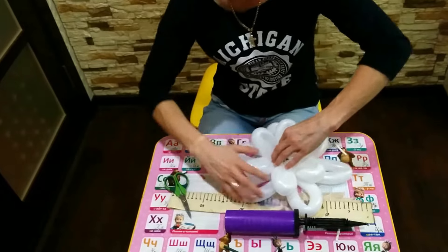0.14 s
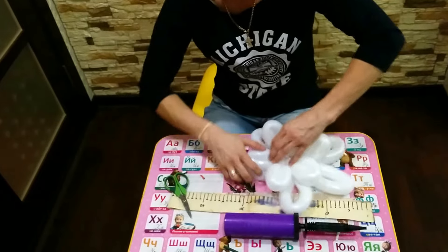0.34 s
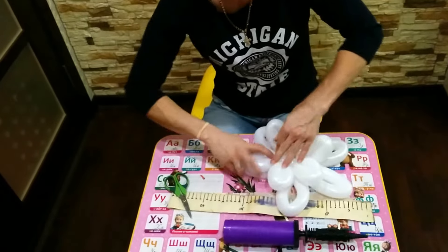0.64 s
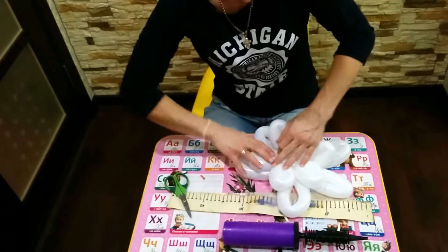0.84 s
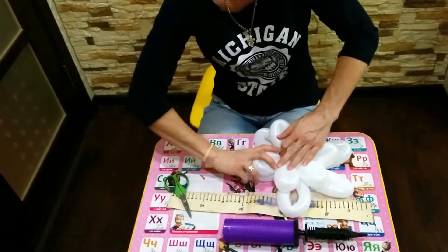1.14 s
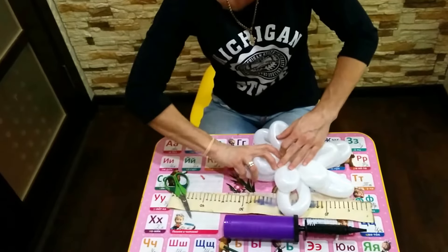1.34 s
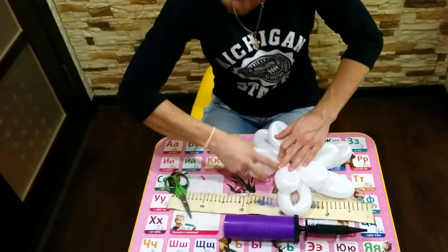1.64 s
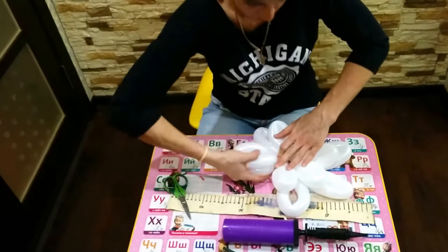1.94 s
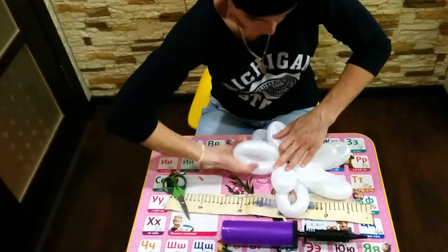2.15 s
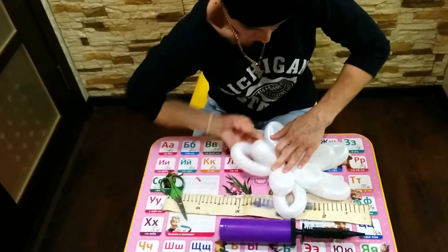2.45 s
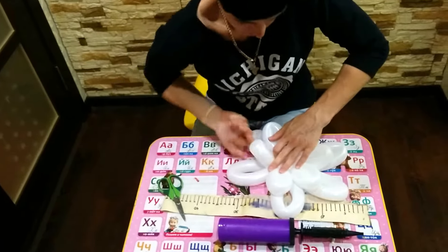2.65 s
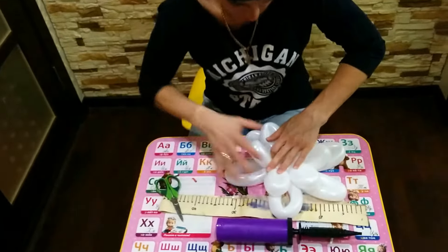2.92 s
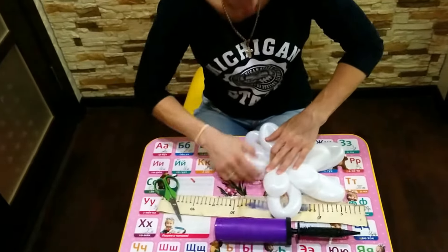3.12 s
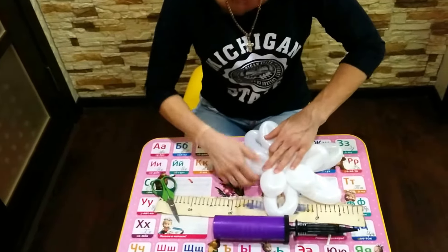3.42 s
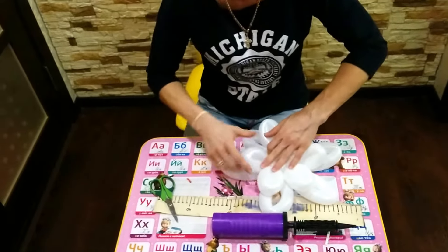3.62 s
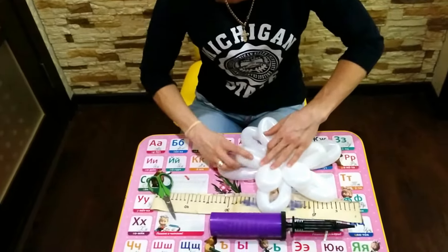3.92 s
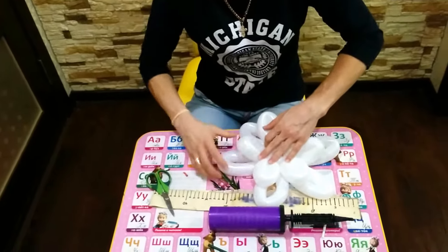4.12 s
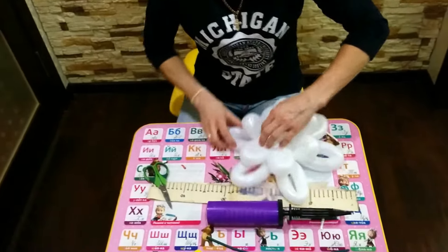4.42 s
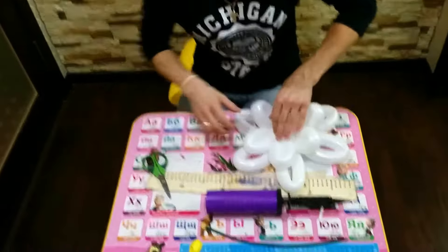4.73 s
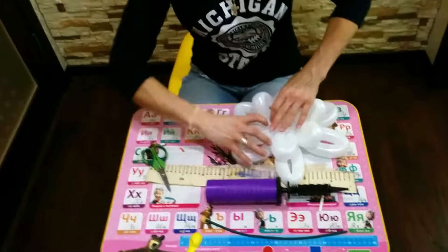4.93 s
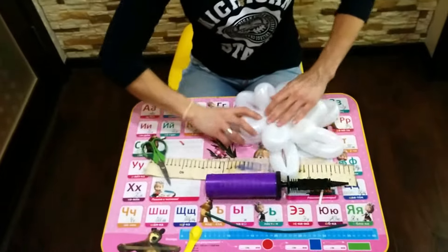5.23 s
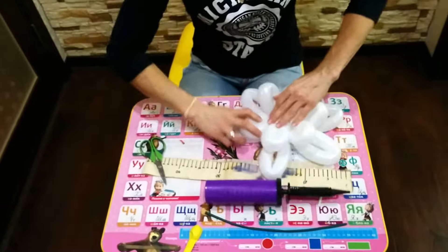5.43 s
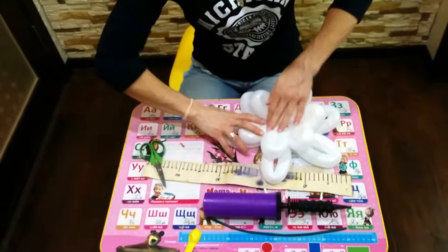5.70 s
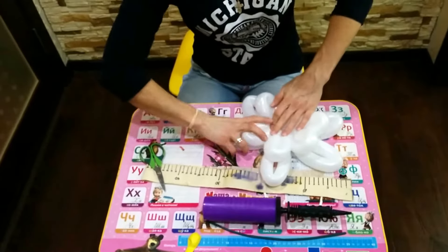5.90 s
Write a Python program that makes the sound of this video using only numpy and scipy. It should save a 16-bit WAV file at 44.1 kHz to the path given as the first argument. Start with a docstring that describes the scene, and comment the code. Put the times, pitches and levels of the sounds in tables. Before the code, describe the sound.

Close, irregular rubbing of rubber against rubber and skin comes from a cluster of balloons being shaped by hand. It starts moderately, builds to two sharp snaps and a run of crackly slips near the middle, then continues in softer fits with another snap near the end. The taut balloons ring briefly and knock gently on a tabletop. The small room has almost no echo and only a faint hum.

```python
"""Inflated latex balloons rub and snap as hands press and twist them on a small table indoors.
Stick-slip friction of rubber on rubber and skin gives a dense rustle of tiny slips, broken by sudden
larger ones, and excites the resonances of the taut skins and the enclosed air. Latex peels free with
bright snaps, released skin rings briefly, and the cluster and hands bump softly on the table.
The short reverberation of a small room and a faint hum lie behind."""
import sys
import numpy as np
from scipy import signal
from scipy.fft import rfft, irfft, next_fast_len
from scipy.io import wavfile

SR = 44100
rng = np.random.default_rng(int(sys.argv[2]) if len(sys.argv) > 2 else 0)


def transcribe(u):
    """Save the signal u as a 16-bit wav file named by the first command-line argument.

    u: samples, shape (n,) or (channels, n), limited to [-1, 1]; the rate is SR.
    q: integer samples, one column per channel.
    """
    v = np.clip(np.atleast_2d(u).T, -1, 1)
    q = np.round(v * 32767).astype(np.int16)
    wavfile.write(sys.argv[1], SR, q)


N = 267246

# Frequency zones fed by friction: air in the lobes, wide skins, narrow skins, a dull gap, pinched necks,
# creases, a second gap, dry surface, finest grit (lower edge [Hz], upper edge [Hz])
ZONES = [(250, 480), (750, 1250), (1550, 2200), (2450, 2700), (3100, 4000), (4500, 5400), (6000, 6600),
         (7200, 9000), (11000, 15000)]
# Steady rubbing (time [s], skin level [dB], air re skin [dB], dry treble re skin [dB])
RUBBING = [(0, -38.5, -16, -8.5), (.07, -73.5, -5.5, 0.5), (.147, -45.5, -16, -30), (.29, -56, -3, -4),
           (.47, -47, -12, -10.5), (.56, -48, -28, -5), (.72, -50, 5.5, -19.5), (.79, -72.5, 15, 3.5),
           (.883, -38, -1, -16.5), (.994, -45.5, -4.5, -18.5), (1.128, -31, -21, -19),
           (1.297, -31.5, -11, -12), (1.36, -52.5, -6, -11.5), (1.45, -31.5, -11, -15.5),
           (1.79, -37, -7.5, -4.5), (1.86, -50.5, 2.5, -5), (2.102, -50, -11.5, -14),
           (2.188, -19, -8.5, 2.5), (2.273, -31, -8.5, -8), (2.369, -44.5, -3.5, -1.5),
           (2.486, -44, 8.5, -8), (2.67, -54.5, 1, -14), (2.731, -20, -9, -12), (2.801, -36.5, -11, -25),
           (2.87, -82, 2, 6.5), (2.951, -70, -18, 4.5), (3.0, -45, -19, -2), (3.11, -29, 2, -5.5),
           (3.323, -46, -8, -10.5), (3.42, -38.5, -11, -14), (3.53, -42, -16, -9), (3.586, -73, -13, 3),
           (3.7, -55.5, 6, -9.5), (4.01, -38.5, -37, -16), (4.08, -43, -41, -3), (4.15, -57, -15, -7),
           (4.181, -77, -9, 4), (4.25, -60, -1, -6), (4.43, -49.5, 4, -9.5), (4.54, -84, 3, 5.5),
           (4.638, -80, 2, -10.5), (4.78, -41, -4, -16), (4.95, -49.5, -17, -13.5), (5.04, -33, -10.5, -18),
           (5.22, -50, 1.5, -7.5), (5.3, -47, 10.5, -17), (5.53, -48.5, -5, -9), (5.595, -33, -14.5, -17),
           (5.776, -51.5, -3, -10), (5.895, -34.5, -14, -15), (6.06, -42, 2.5, -21)]
# Sudden slips (time [s], skin level [dB], air re skin [dB], dry treble re skin [dB], fade at 1 kHz [s])
SUDDEN_SLIPS = [(0.107, -49.5, -15, -16, 0.083), (.145, -37, -49, -22, 0.078),
                (0.261, -42.5, -16, -49, .06), (0.3084, -34.5, -21, -3, .073),
                (0.475, -39.5, -5, -35, 0.15), (0.54, -34, -5.5, -24, 0.13), (0.791, -43, -4, -35, 0.04),
                (0.816, -38.5, -6.5, -28, .09), (1.02, -39, -2, -22, 0.057), (1.133, -32, -11, -20, 0.02),
                (1.143, -40.5, -1, -2, 0.15), (1.383, -34, -4.5, -15, 0.1), (1.636, -27, -41, 0, 0.018),
                (1.857, -38, -3, -18, 0.096), (1.946, -41.5, -5, -15, .066), (2.033, -39, -13, -17, .043),
                (2.071, -40, -24, -12, 0.035), (2.121, -29.5, -15, -31, 0.17),
                (2.152, -19.5, -8.5, -21, 0.091), (2.207, -47.5, -0.5, 7, 0.16),
                (2.369, -31.5, -7.5, -14, 0.064), (2.408, -36.5, -3, -7.5, 0.16),
                (2.493, -34, -9, -28, 0.04), (2.623, -49, 7.5, -33, 0.13), (2.6753, -15.5, -2, -14.5, 0.07),
                (2.956, -41.5, -12, 4.5, 0.063), (2.985, -35.5, -16.5, -3, 0.067),
                (3.03, -31.5, -2, -0.5, 0.047), (3.047, -30.5, -4, 0.5, 0.087),
                (3.082, -24, -16, -4, 0.053), (3.157, -29.5, -4, -7, 0.092), (3.331, -40, -2, -3.5, 0.092),
                (3.42, -36.5, -9, -4.5, 0.042), (3.591, -47, -9, -13.5, 0.075),
                (3.654, -44.5, -3.5, -23, 0.083), (3.734, -39, 0, -13, 0.22),
                (3.856, -35.5, -29, -11.5, 0.096), (3.935, -32.5, -6, -24, 0.15),
                (4.012, -34, -14, -4.5, 0.059), (4.184, -58, -6, -2, .05), (4.198, -41.5, -4, -23, 0.059),
                (4.25, -40.5, 1, -19.5, 0.033), (4.348, -38.5, 11, -42, 0.062),
                (4.641, -46.5, 7.5, -38, 0.071), (4.7, -48, -8.5, -19, 0.052),
                (4.724, -29.5, 5, -23, 0.052), (4.845, -39, -10, -12, 0.064),
                (4.909, -39.5, -15, -16, 0.055), (4.976, -44, 8.5, -30, 0.061),
                (5.1638, -29.5, -18, -6.5, 0.11), (5.277, -41.5, -13, -11, 0.096),
                (5.401, -35.5, -20, -36, 0.099), (5.512, -37.5, -14, -19, 0.037),
                (5.558, -40.5, -25.5, 0, 0.051), (5.601, -33, -1.5, -37, 0.044),
                (5.782, -39.5, -6.5, -34, 0.12), (5.835, -38, -23, -5.5, 0.036),
                (5.898, -31, -42, -13, 0.039), (6.025, -36, -10, -8.5, 0.26)]
# Response of each zone (offset [dB], extra gain on pressing [dB/dB], air share [0-1], treble share [0-1])
ZONE_RESPONSE = [(0, 0.014, 1, 0.07), (2.0, 0.0013, 0.24, 0.03), (-1, -0.03, 0, .05),
                 (-1.5, -0.31, 0, 0.34), (-1.5, .05, 0, 0.36), (-2, 0.08, 0.08, 0.95),
                 (-2, -0.2461, 0.03, 0.61), (1, -0.1141, 0.14, 1), (2.5, -0.1753, 0.03, 1)]
# Lean of the treble towards the creases and away from the grit (time [s], lean [dB])
TREBLE_LEAN = [(0, 2), (.2, 0), (1.2, 0), (1.55, -3), (1.8, -2), (2.1, -3), (2.24, 6), (2.4, -8.5),
               (2.65, -2), (2.74, 3), (2.95, -2.5), (3.1, 3.5), (3.4, -3), (4.1, 0.5), (4.5, -3),
               (5.1, 0.5), (5.5, 3), (6.06, 2.5)]
# Part each zone takes in that lean (share [dB/dB])
ZONE_LEAN = [-0.14, -0.061, -0.02, -0.33, 0.18, 1, .05, -0.15, -0.72]
# Spectral envelope of the friction (frequency [Hz], gain [dB])
FRICTION_SPECTRUM = [(60, -43), (150, -26.5), (220, -11.5), (400, 0.5), (620, -3), (1100, -1), (1900, -0.5),
                     (2600, 2.5), (3500, 2.5), (4300, -1.5), (5000, 2), (6300, -4.5), (8000, 5),
                     (11000, -8.5), (15000, -11)]
# Normal modes of the skins and the enclosed air (frequency [Hz], bandwidth [Hz], gain [dB])
MODES = [(150, 20, -8), (240, 30, -3), (316, 20, 1), (388, 26, 3), (438, 24, 0), (565, 20, 0),
         (625, 22, -1), (777, 24, 0), (880, 30, -3), (950, 28, 1), (1040, 30, -1), (1137, 24, 2),
         (1210, 28, 1), (1257, 26, -1), (1375, 35, -1), (1480, 35, -3), (1575, 35, -1), (1655, 28, -1),
         (1750, 24, 1), (1812, 28, 0), (2000, 40, -2), (2165, 30, 0), (2350, 45, -2), (2530, 50, -4),
         (2930, 60, -4), (3150, 70, -3), (3390, 70, 0), (3650, 70, -2), (4130, 60, -5), (4440, 60, -7)]
# Latex peeling free (time [s], relative level [dB], ring frequency [Hz])
PEEL_SNAPS = [(0.312, -32, 3860), (0.571, -24, 7650), (1.148, -12.5, 5020), (1.294, -20, 3900),
              (1.497, -31, 4000), (1.634, -16, 4170), (2.051, -28.5, 8040), (2.1556, -18, 4070),
              (2.188, -1, 4480), (2.4077, -26, 7700), (2.6795, -5.5, 5050), (2.957, -28, 7440),
              (2.9836, -18.5, 7100), (3.023, -17.5, 7500), (3.055, -14, 4330), (3.1636, -11.5, 4330),
              (3.332, -29, 7900), (3.4212, -23, 3960), (3.8845, -23, 3960), (4.016, -23, 5030),
              (5.1696, -10.5, 4250), (5.517, -21.5, 4370), (5.578, -25, 7700), (5.887, -22, 3940),
              (6.0363, -31, 4100)]
# Cluster and hands meeting the table (time [s], level [dB], pitch [Hz], 60 dB decay time [s])
TABLE_BUMPS = [(0.27, -49, 96, 0.24), (0.422, -37, 91, 0.076), (0.41, -37.5, 225, 0.11),
               (0.701, -43.5, 78, 0.23), (.72, -32.5, 238, 0.11), (0.973, -35.5, 223.3, 0.37),
               (2.18, -39, 45, 0.17), (2.479, -23, 173.4, 0.12), (2.677, -40, 69, 0.32),
               (2.698, -31.5, 148, 0.33), (3.047, -41.5, 121, 0.12), (3.173, -44, 109, 0.19),
               (4.211, -31.5, 214, 0.18), (4.359, -42, 90, 0.2), (4.431, -40.5, 85.6, 0.15),
               (4.652, -46.5, 112, 0.21), (4.73, -41, 103, 0.17), (4.984, -31, 191, 0.19),
               (5.289, -33, 88, 0.096), (5.822, -43.5, 151, 0.17)]
# Spectrum of the background hum (frequency [Hz], relative density [dB])
HUM_SPECTRUM = [(18, -43), (30, -14), (108, 10.5), (144, 3), (208, -51), (315, -0.5), (492, -29.5),
                (1230, -2), (4910, -42.5), (8280, -13), (15500, -41)]

USUAL_DB = -41.5  # skin level under ordinary pressing


def rustle(zones_db, slips, patchy_db):
    """Stick-slip friction radiates broadband noise; each band comes and goes as contacts shift."""
    out = 0
    for k, (hz, band) in enumerate(narrow_bands()):
        drive = slips[k % 2] * from_db(excitation_db(zones_db, hz) + patchy_db * drift(rate_hz=28.0))
        out = out + signal.sosfilt(band, drive) * np.sqrt(SR / hz)
    return from_db(-6.0) * out


def ringing(zones_db, per_s, wander_db):
    """Resonance: coarser slips excite each mode of skin and air; its strength wanders with the grip."""
    out = 0
    for k, (hz, width, mode_db) in enumerate(MODES):
        slips = with_jolts(tiny_slips(per_s, spread_db=3.0), size=15.0)
        level_db = excitation_db(zones_db, hz) + mode_db + wander_db * drift(rate_hz=12.3)
        r = np.exp(-np.pi * width / SR)  # pole radius
        resonator = [1 - r * r, 0, r * r - 1], [1, -2 * r * np.cos(2 * np.pi * hz / SR), r * r]
        tone = signal.lfilter(*resonator, slips * from_db(level_db) + 1e-18)
        tone = signal.sosfilt(band_pass(1, hz / 1.3, hz * 1.3), tone)  # each ring stays near its pitch, without a click
        out = out + tone * np.sqrt(SR / width) * (-1) ** k
    return from_db(-23.0) * out


def friction_db():
    """Incoherent sources add in power: steady rubbing plus sudden slips give each zone's level."""
    t = np.arange(N) / SR
    times, *controls = np.transpose(RUBBING)
    power = from_db(2 * zone_levels(*[np.interp(t, times, c) for c in controls]))
    khz = np.mean(ZONES, axis=1, keepdims=True) / 1000
    rise_s, fade_stretch = 0.0015 * khz ** 0.029, khz ** 0.044  # higher zones are slightly slower
    for start, *controls, fade_s in SUDDEN_SLIPS:
        span = slice(round(start * SR), round((start + 2 * fade_s) * SR))
        age = np.maximum(t[span] - start, 0)
        rise = 1 - np.exp(-age / rise_s)
        fall = from_db(-40 * (age / (fade_s * fade_stretch)) ** 2)
        power[:, span] += from_db(2 * zone_levels(*controls)) * fall * rise
    lean_db = np.interp(t, *np.transpose(TREBLE_LEAN))
    return 10 * np.log10(power) + np.outer(ZONE_LEAN, lean_db)


def zone_levels(skin_db, air_db, treble_db):
    """Gains add in decibels: each zone follows the skin level and takes its share of air and treble."""
    offset_db, press, air, treble = np.transpose(ZONE_RESPONSE)[:, :, None]
    return skin_db + offset_db + press * (skin_db - USUAL_DB) + air * air_db + treble * treble_db


def excitation_db(zones_db, hz):
    """Spectral shaping: the level of a zone, or a blend between two, weighted by the friction spectrum."""
    place = np.interp(np.log(hz), np.log(np.ravel(ZONES)), np.arange(len(ZONES)).repeat(2))
    low = min(int(place), len(ZONES) - 2)
    blend_db = zones_db[low] + (place - low) * (zones_db[low + 1] - zones_db[low])
    return blend_db + at_hz(FRICTION_SPECTRUM, hz)


def tiny_slips(per_s, spread_db):
    """Shot noise: independent slips form a train of impulses of uneven size and sign, at unit power."""
    sizes = from_db(spread_db * np.minimum(rng.exponential(1, N), 4)) * rng.choice([-1, 1], N)
    return unit_power(sizes * (rng.random(N) < per_s / SR))


def with_jolts(slips, size):
    """Impulsive excitation: each sudden slip opens with one click set among the tiny ones."""
    onsets = np.round((np.array(SUDDEN_SLIPS)[:, 0] + 0.0008) * SR).astype(int)
    jolted = slips.copy()
    jolted[onsets] = size
    return jolted


def snaps(t60_s=0.03):
    """A brief transient has a broad spectrum: peeling latex gives a treble crackle with a short ring."""
    out, age = np.zeros(N + 2000), np.arange(2000) / SR
    treble = band_pass(2, 3500, 11000)
    for start, level_db, hz in PEEL_SNAPS:
        burst = signal.sosfilt(treble, rng.standard_normal(len(age))) * from_db(-60 * age / t60_s)
        ring = signal.sosfilt(band_pass(1, hz * 0.98, hz * 1.02), burst)
        out[round(start * SR):][:len(age)] += from_db(level_db - 15.0) * (burst + 7.4 * ring)
    return out[:N]


def skin_pops(t60_s=0.04, lag_s=0.0028):
    """Free vibration: skin released by a sudden slip springs back and rings, at a random pitch."""
    out, age = np.zeros(N + 4000), np.arange(4000) / SR
    for start, skin_db, *_ in SUDDEN_SLIPS:
        hz = rng.uniform(985, 1260)
        tone = np.sin(2 * np.pi * hz * age) + 0.5 * np.sin(2 * np.pi * 1.65 * hz * age)
        level_db = skin_db - 1 + 0.38 * (skin_db - USUAL_DB)  # hard slips ring disproportionately
        out[round((start + lag_s) * SR):][:len(age)] += from_db(level_db - 60 * age / t60_s) * tone
    return signal.sosfilt(signal.butter(2, 400, "high", fs=SR, output="sos"), out[:N])


def bumps(swell_s=0.01):
    """A soft impact excites only low frequencies: a damped tone in a puff of noise from the table."""
    out, age = np.zeros(N + SR // 2), np.arange(SR // 2) / SR
    for start, level_db, hz, t60_s in TABLE_BUMPS:
        noise = rng.standard_normal(len(age))
        puff = unit_power(signal.sosfilt(band_pass(2, hz * 0.89, hz * 2.3), noise))
        tone = np.sin(2 * np.pi * hz * age)
        envelope = (1 - np.exp(-age / swell_s)) ** 2 * from_db(-60 * age / t60_s)
        out[round(start * SR):][:len(age)] += from_db(level_db) * envelope * (tone + 0.8 * puff)
    return out[:N]


def room(x, t60_s=0.088, wall_cut_hz=2600):
    """Reverberation: eighteen echo paths repeat, losing treble to wall absorption on every round."""
    size = next_fast_len(N + SR)
    omega = 2 * np.pi * np.arange(size // 2 + 1) / size  # radians per sample
    wall = 1 / (1 + 1j * omega * SR / (2 * np.pi * wall_cut_hz))
    response = 0
    for k, delay_s in enumerate(rng.uniform(0.0066, 0.03, size=18)):
        loop = from_db(-60 * delay_s / t60_s) * wall * np.exp(-1j * omega * round(delay_s * SR))
        response = response + loop / (1 - loop) * (-1) ** k
    return irfft(rfft(x, size) * response, size)[:N]


def hum(level_db=-74):
    """Stationary noise, strongest in the bass, forms the faint background of the room."""
    white = rng.standard_normal((2, N))
    bands = (from_db(at_hz(HUM_SPECTRUM, hz)) * signal.sosfilt(band, white[k % 2])
             for k, (hz, band) in enumerate(narrow_bands()))
    return from_db(level_db) * unit_power(sum(bands))


def drift(rate_hz):
    """Slow random modulation of unit spread: coarse noise through a double one-pole low-pass."""
    step = 40  # samples per noise value
    r = np.exp(-2 * np.pi * step * rate_hz / SR)
    slow = signal.lfilter([1], [1, -2 * r, r * r], rng.standard_normal(N // step + 2002))[2000:]
    return np.interp(np.arange(N) / step, np.arange(len(slow)), unit_power(slow))


def narrow_bands():
    """A quarter-octave filter bank, as pairs of centre frequency and filter."""
    edges = 28 * 2 ** (np.arange(38) / 4)
    return [(np.sqrt(low * high), band_pass(3, low, high)) for low, high in zip(edges, edges[1:])]


def band_pass(order, low_hz, high_hz):
    """A maximally flat band-pass filter."""
    return signal.butter(order, [low_hz, high_hz], "band", fs=SR, output="sos")


def at_hz(spectrum, hz):
    """Interpolate a spectrum on a log-frequency axis."""
    frequencies, levels_db = np.transpose(spectrum)
    return np.interp(np.log(hz), np.log(frequencies), levels_db)


def from_db(db):
    """Decibels to amplitude ratio."""
    return 10 ** (np.asarray(db) / 20)


def unit_power(x):
    """Scale to a mean square of one."""
    return x / np.sqrt(np.mean(x ** 2) + 1e-20)


def scene():
    """Superposition of the balloons, their reverberation and the hum in one channel."""
    zones_db = friction_db()
    slips = [with_jolts(tiny_slips(per_s=4000, spread_db=3.0), size=3.0) for _ in range(2)]
    rubbing = rustle(zones_db, slips, patchy_db=3.0) + ringing(zones_db, per_s=350, wander_db=4.5)
    balloons = rubbing + snaps() + skin_pops() + bumps()
    return (balloons + from_db(-35) * room(balloons) + hum())[None]


def record(dry):
    """Soft saturation rounds the peaks; a steep low-pass removes the highest treble."""
    ceiling, stop_hz = 0.8, 16432
    rounded = ceiling * np.tanh(dry / ceiling)
    return signal.sosfilt(signal.cheby2(12, 60, stop_hz, fs=SR, output="sos"), rounded)


dry = scene()
out = record(dry)
transcribe(out)
```